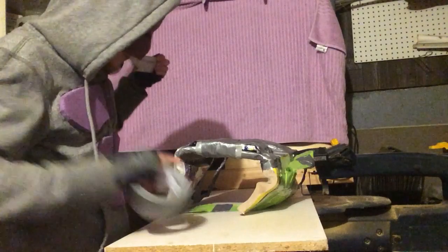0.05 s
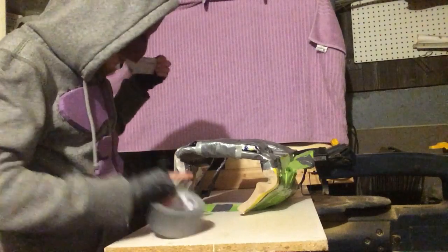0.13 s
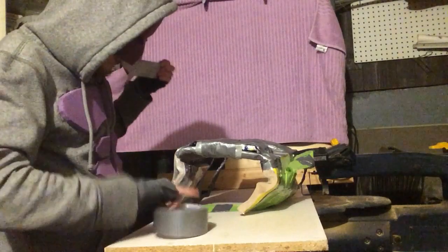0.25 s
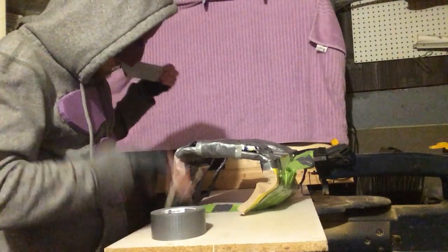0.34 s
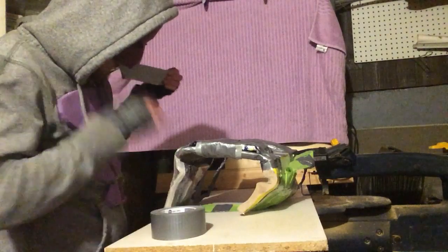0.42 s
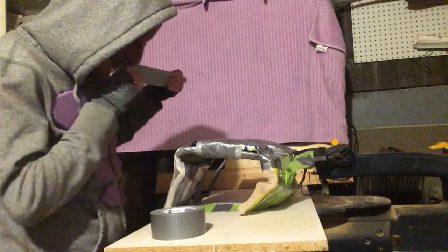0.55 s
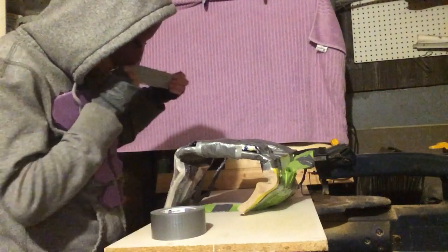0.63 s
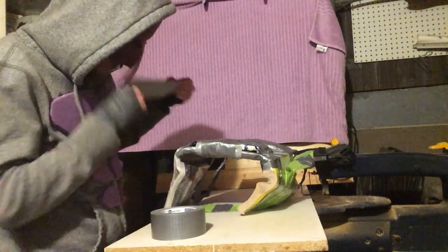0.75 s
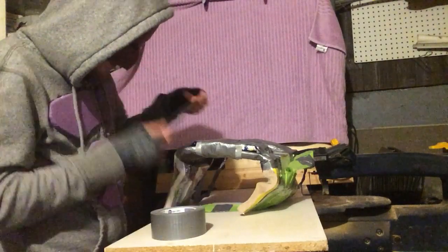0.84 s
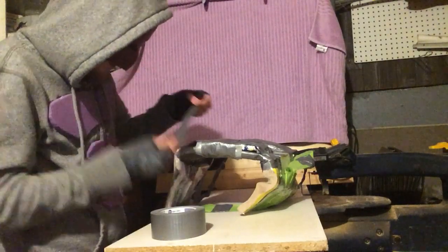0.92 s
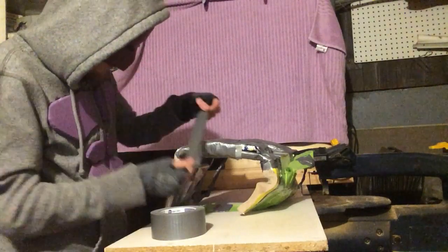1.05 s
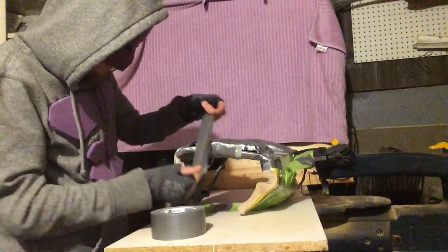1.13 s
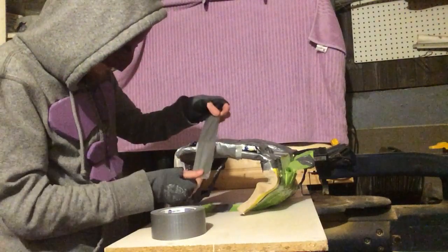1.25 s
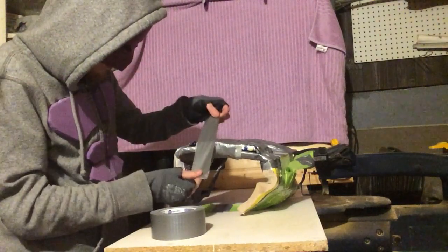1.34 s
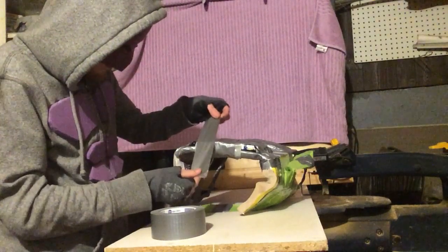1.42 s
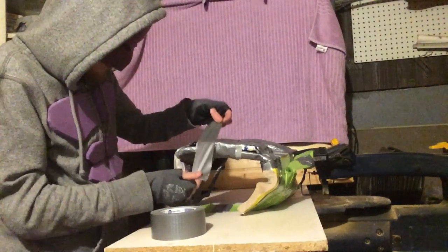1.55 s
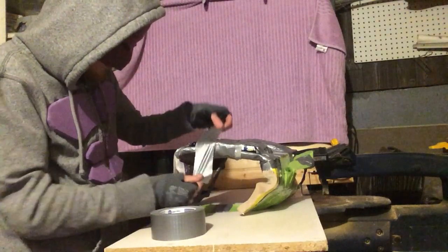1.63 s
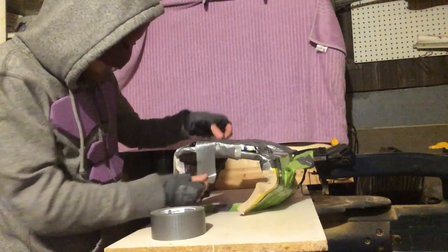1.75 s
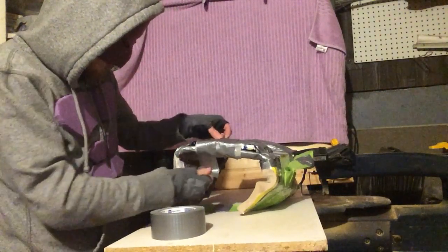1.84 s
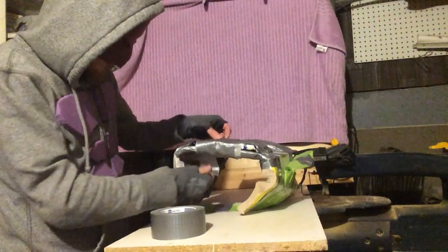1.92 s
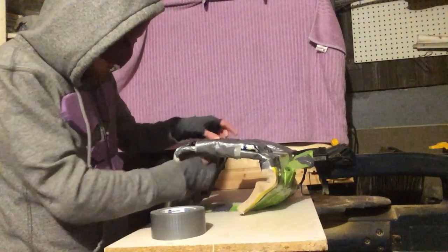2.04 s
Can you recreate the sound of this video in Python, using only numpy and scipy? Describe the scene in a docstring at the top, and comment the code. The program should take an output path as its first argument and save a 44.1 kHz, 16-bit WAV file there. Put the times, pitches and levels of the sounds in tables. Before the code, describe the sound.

A roll of duct tape lands on a wooden board with a dull thud, then at once a louder hollow clack; faint sleeve and tape rustles follow, close up in a small workshop with low hum.

```python
"""A roll of duct tape is set down on a wooden board in a small workshop: its edge lands with a soft thud,
then it tips flat with a hollow clack, and something metal rings on faintly. Impacts are damped modes plus
bursts of coloured noise. Sleeves and a torn strip of tape rustle and tick in the hands, as dense random
grains and short band-limited bursts, over a steady hum of wavering sine lines and soft air noise."""
import sys
import numpy as np
from scipy import signal
from scipy.fft import rfft, irfft
from scipy.io import wavfile
from scipy.ndimage import uniform_filter1d

SR = 44100
rng = np.random.default_rng(int(sys.argv[2]) if len(sys.argv) > 2 else 0)


def dump_mix(stems):
    """Bounce the given channels to the path in sys.argv[1] as a 16-bit WAV at rate SR."""
    frames = np.atleast_2d(stems).T  # one column per channel
    limited = np.clip(frames, -1, 1)  # hard clip at full scale
    pcm = np.round(limited * 32767).astype(np.int16)
    wavfile.write(sys.argv[1], SR, pcm)


N = 92610

# Modes of the board on its bench. Each row: frequency in Hz, relative level in dB, 60 dB decay time in seconds.
BOARD_MODES = [(71, -23.5, .24), (116, -20.5, .22), (228, -11, 0.092), (295.6, 1, .12), (346, -2.5, .15),
               (430.4, -3, .15), (537.3, -18, .1), (763, -20, .09), (849.4, -22.5, .08)]


def undb(db):
    """Level to amplitude: 20 dB is a factor of ten."""
    return 10 ** (np.asarray(db) / 20)


def unit(x):
    """Normalisation to an rms of 1, so that a later gain sets the level."""
    return x / np.sqrt(np.mean(x ** 2))


def clock():
    """Sampling: the time of each sample in seconds."""
    return np.arange(N) / SR


def fade(t60):
    """Exponential damping: the amplitude falls by 60 dB in t60 seconds."""
    return np.exp(-np.log(1000) * clock() / t60)


def lookup(points, hz):
    """Interpolation of a table on a logarithmic frequency axis."""
    table_hz, values = np.array(points).T
    return np.interp(np.log(hz + 1e-9), np.log(table_hz), values)


def through(x, response):
    """Linear superposition: convolution with an impulse response."""
    return signal.fftconvolve(x, response)[:N]


def colour(x, points):
    """Minimum-phase filtering: a causal response of unit energy with the given spectrum."""
    size = 4096
    log_gain = np.log(undb(lookup(points, np.fft.rfftfreq(size, 1 / SR))))
    cepstrum = irfft(log_gain)
    # folding the cepstrum onto positive times makes the response causal
    cepstrum[1:size // 2] *= 2
    cepstrum[size // 2 + 1:] = 0
    response = irfft(np.exp(rfft(cepstrum)))
    return through(x, response / np.linalg.norm(response))


def push(s, db):
    """Impulsive excitation: one contact as a single-sample pulse."""
    return undb(db) * (np.arange(N) == int(s * SR))


def ring(modes, rise_s):
    """Modal superposition: damped sines build up while the contact lasts, then ring down."""
    t = clock()
    swell = np.sin(np.pi / 2 * np.clip(t / rise_s, 0, 1)) ** 2
    free_s = np.maximum(t - rise_s, 0)
    total = np.zeros(N)
    for hz, db, t60 in modes:
        decay = np.exp(-np.log(1000) * free_s / t60)
        total += undb(db) * decay * np.sin(2 * np.pi * hz * t)
    return swell * total


def burst(t60):
    """Damped broadband excitation: dying noise of unit energy."""
    x = rng.standard_normal(N) * fade(t60)
    return x / np.linalg.norm(x)


def walk(rate):
    """Slow random modulation: a wander of rms 1 between values drawn about rate times a second."""
    k = int(SR / rate)
    steps = np.repeat(rng.standard_normal(N // k + 1), k)
    return unit(uniform_filter1d(steps, k)[:N])


def thud(room):
    """Impact excitation: the soft edge's first contact rings the board, and every contact knocks."""
    # The roll's edge presses on the board. Each row: start in seconds, relative level in dB.
    contacts = [(0.2057, -7.5), (.2125, -2.5), (.218, -2), (.224, 3)]
    # Dull knock of the soft tape edge. Each row: frequency in Hz, relative spectral level in dB per Hz.
    knock_spectrum = [(40, -15), (150, -11), (320, 11), (650, -10), (950, -16), (1200, -27), (2000, -32.5),
                      (3500, -47), (8000, -59), (16000, -67)]
    knock_db, knock_t60_s = -2, .04
    board_db, board_rise_s, room_db = -23, 0.011, -15

    board = through(push(contacts[0][0], board_db), ring(BOARD_MODES, board_rise_s))
    knocks = sum(through(push(s, db), burst(knock_t60_s)) for s, db in contacts)
    direct = board + undb(knock_db) * colour(knocks, knock_spectrum)
    return direct + undb(room_db) * through(direct, room)


def clack(room):
    """Modal impact: each contact cracks; the first rings core, board and nearby metal."""
    # The rim slaps flat in a quick run of contacts. Each row: start in seconds, relative level in dB.
    slaps = [(0.3599, -5), (0.3625, -3.5), (0.3671, 0.5), (0.3694, -0.5), (0.3724, -4)]
    # Modes of the roll and its cardboard core. Each row: frequency in Hz, relative level in dB,
    # 60 dB decay time in seconds.
    roll_modes = [(234, -5.5, 0.22), (366.3, -3, 0.22), (506, 0, 0.17), (560, -4.5, .15), (722, -5.5, .19),
                  (848.4, 5, .11), (968, -2, .11), (1228.4, 2, .18), (1258.5, -4, .25), (1427, -0.5, .1),
                  (1672, 0.5, .11), (1866, 2.5, .12), (2230, -7.5, 0.044), (2618, -5, 0.19),
                  (2736, -3, .11), (2917, -7, .12), (3240, -5, .07), (3950, -14, .07)]
    # Crack of the contact. Each row: frequency in Hz, relative spectral level in dB per Hz.
    crack_spectrum = [(30, -21), (70, -10.5), (120, -6.5), (175, -8), (300, 5.5), (800, -4), (1080, -6.5),
                      (1300, -0.5), (1550, -6), (1900, -3), (2800, -9), (3300, -12.5), (4200, -20),
                      (5800, -32.5), (7500, -46.5), (12000, -57), (16000, -69.5)]
    crack_db, crack_t60_s, room_db = 8.5, .04, -9
    roll_db, board_db, rise_s = -23, -26, .008
    metal_hz, metal_db, metal_t60_s = 759, -58.5, 1.7  # metal on the bench, shaken by the clack

    start = slaps[0][0]
    body = through(push(start, roll_db), ring(roll_modes, rise_s))
    board = through(push(start, board_db), ring(BOARD_MODES, rise_s))
    metal = through(push(start, 0), ring([(metal_hz, metal_db, metal_t60_s)], rise_s))
    cracks = sum(through(push(s, db), burst(crack_t60_s)) for s, db in slaps)
    crack = undb(crack_db) * colour(cracks, crack_spectrum)
    return body + board + crack + metal + undb(room_db) * through(crack, room)


def rustle(strokes, spectrum):
    """Friction as a random pulse train: dense tiny slips swell and fade with each stroke."""
    grains_per_s, spread_db = 5600, 3.5
    slips = (rng.random(N) < grains_per_s / SR) * rng.standard_normal(N)
    grains = slips * undb(spread_db * rng.standard_normal(N))
    t = clock()
    effort = sum(undb(db) * np.exp(-.5 * ((t - s) / half) ** 2) for s, db, half in strokes)
    return unit(colour(grains, spectrum)) * effort


def hands(room):
    """Friction and sudden release: sleeves brush, fingers slide on the strip, its glue lets go in ticks."""
    # Sleeves brush. Each row: centre in seconds, peak level in dB, Gaussian half length in seconds.
    sleeve_strokes = [(.003, -59, 0.019), (.76, -66.5, .012), (.878, -66.5, .013), (1.075, -79, .014),
                      (1.26, -75, .01), (1.996, -68, 0.0098), (2.045, -64, .014)]
    # Cloth spectrum. Each row: frequency in Hz, relative spectral level in dB per Hz.
    sleeve_spectrum = [(200, -14.5), (900, -3), (1700, -5), (3500, -2), (6000, -10), (10000, -14.5),
                       (16000, -23)]
    # Fingers slide on the tape. Each row: centre in seconds, peak level in dB, Gaussian half length in seconds.
    finger_strokes = [(.11, -62, 0.016), (.135, -60, 0.011), (.25, -70, .03), (.488, -69, .012),
                      (.535, -74, .02), (.703, -72.5, .012), (.762, -78, 0.014), (.92, -72, .014),
                      (1.055, -70, .016), (1.262, -68.5, .01), (1.375, -77, .012), (2.034, -60.5, .012),
                      (2.096, -50, 0.0077)]
    # Tape spectrum. Each row: frequency in Hz, relative spectral level in dB per Hz.
    finger_spectrum = [(300, -6), (1200, -3.5), (2500, -0.5), (6000, -1), (11000, -2), (14000, -7.5),
                       (16000, -16)]
    # The sticky strip ticks. Each row: start in seconds, level in dB before the band filter, centre in Hz.
    ticks = [(.130, -33.5, 5900), (1.0445, -43, 8010), (1.258, -46, 5000), (2.0247, -41, 6000),
             (2.0866, -16.5, 4000), (2.0908, -27.5, 9100)]
    tick_t60_s, tick_octaves, tick_top_hz = 0.0023, 0.71, 12500  # octaves to each side of the centre
    room_db = -10

    direct = rustle(sleeve_strokes, sleeve_spectrum) + rustle(finger_strokes, finger_spectrum)
    for s, db, hz in ticks:
        edges = np.minimum(hz * 2 ** np.array([-tick_octaves, tick_octaves]), tick_top_hz)
        band = signal.butter(2, edges, "band", fs=SR, output="sos")
        direct = direct + signal.sosfilt(band, through(push(s, db), burst(tick_t60_s)))
    return direct + undb(room_db) * through(direct, room)


def hum():
    """Tonal and broadband noise: wavering lines of a distant motor over soft air noise."""
    # Lines of the motor. Each row: mean frequency in Hz, rms level in dB before the waver.
    motor_lines = [(119, -74), (189, -69), (360, -80.5), (690, -78), (953, -84.5), (1523, -81.5)]
    # Air noise. Each row: frequency in Hz, relative spectral level in dB per Hz.
    air_spectrum = [(25, -9), (48, -2.5), (90, -8.5), (120, -1), (155, 0), (200, -3.5), (240, 0),
                    (290, -0.5), (360, 2), (450, -5), (600, -4.5), (660, -9.5), (720, -5.5), (850, -13),
                    (1150, -15), (1600, -11.5), (2200, -16.5), (4300, -17.5), (5500, -22.5), (12000, -28.5),
                    (14000, -35), (16000, -47)]
    waver_db, drift, air_db = -0.25, 0.0013, -64.5  # drift is a fraction of the frequency

    lines = np.zeros(N)
    for hz, db in motor_lines:
        level = undb(db + waver_db * walk(6))
        line_hz = hz * (1 + drift * walk(3))
        lines += level * np.sin(2 * np.pi * np.cumsum(line_hz) / SR)
    air = unit(colour(rng.standard_normal(N), air_spectrum))
    return np.sqrt(2) * lines + undb(air_db) * air  # sqrt(2) turns rms into peak


def workshop():
    """Diffuse reverberation: echoes build up quickly and die sooner in the treble."""
    # Reverberation by band. Each row: centre in Hz, 60 dB decay time in seconds.
    decays = [(60, .32), (300, .28), (900, .235), (2000, .215), (4000, .2), (8000, 0.16), (16000, 0.16)]
    delay_s, build_s = 0.014, .012

    spectrum, hz = rfft(rng.standard_normal(N)), np.fft.rfftfreq(N, 1 / SR)
    tail = np.zeros(N)
    for centre, t60 in decays:
        # overlapping triangular bands that add up to 1
        band = lookup([(other, float(other == centre)) for other, _ in decays], hz)
        tail += irfft(spectrum * band, N) * fade(t60)
    tail *= np.clip((clock() - delay_s) / build_s, 0, 1)
    return tail / np.linalg.norm(tail)


def scene():
    """Superposition of all sources; the impacts and hands share the echoes of one small room."""
    room = workshop()
    return (thud(room) + clack(room) + hands(room) + hum())[None]


def record(dry):
    """Band limiting: the recorder cuts the deepest bass and the top."""
    low_cut_hz, top_hz = 38, 15600
    dry = signal.sosfilt(signal.butter(3, low_cut_hz, "high", fs=SR, output="sos"), dry)
    return signal.sosfilt(signal.ellip(10, .2, 70, top_hz, fs=SR, output="sos"), dry)


dry = scene()
out = record(dry)
dump_mix(out)
```